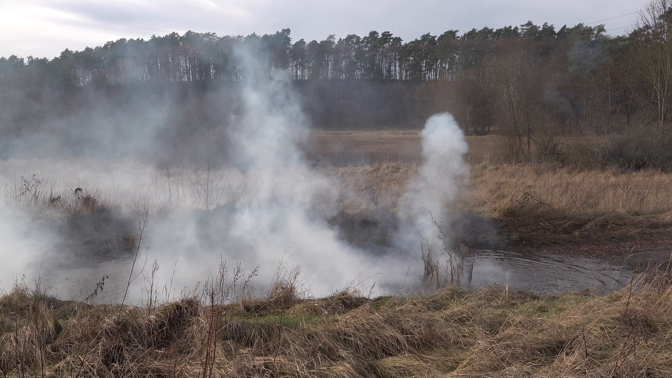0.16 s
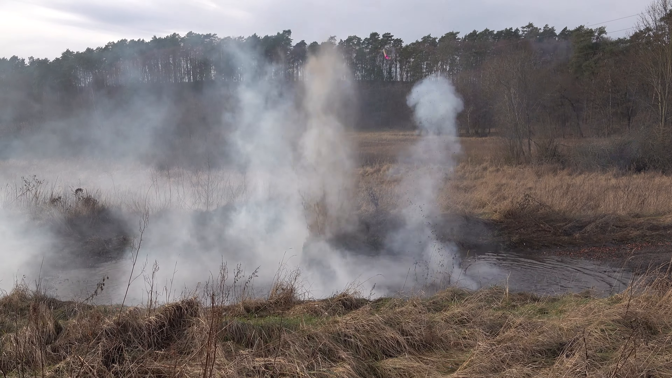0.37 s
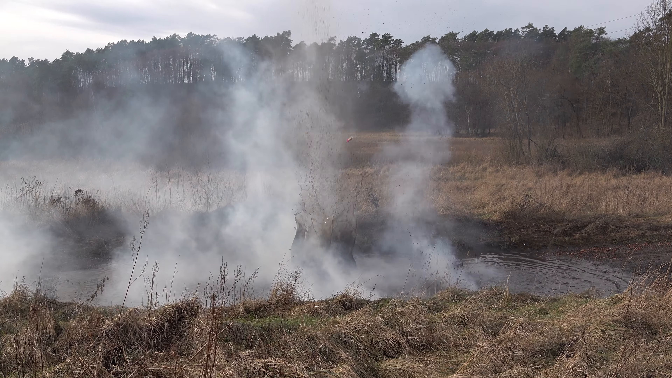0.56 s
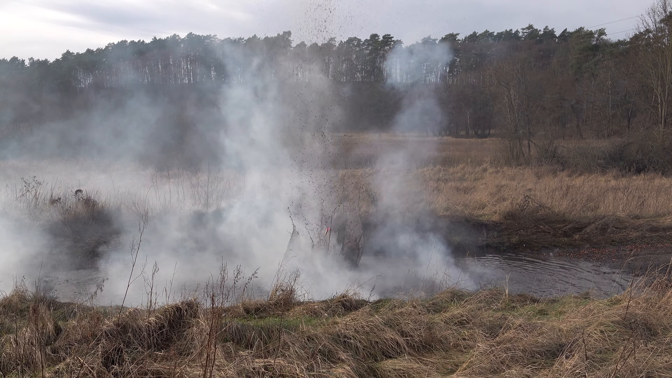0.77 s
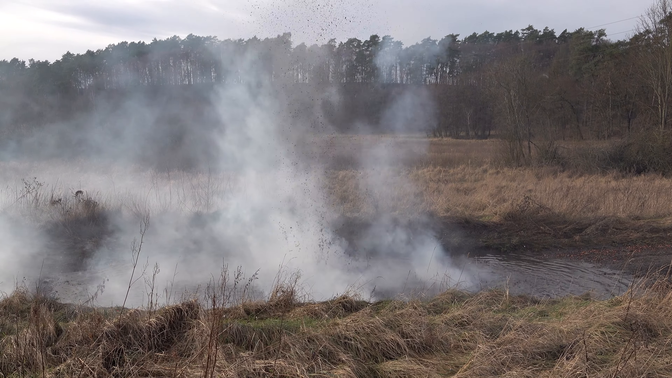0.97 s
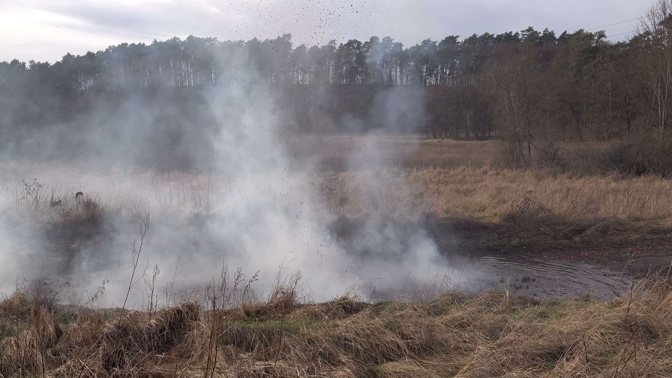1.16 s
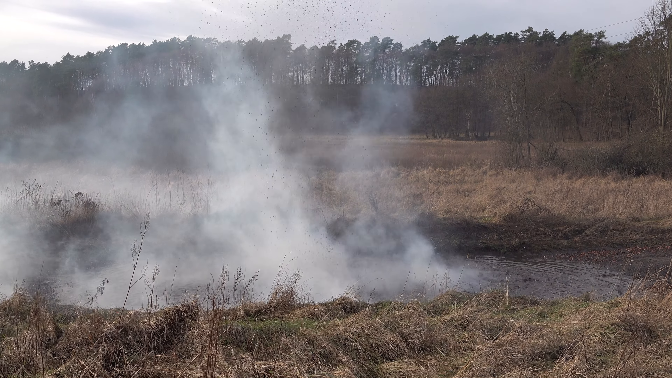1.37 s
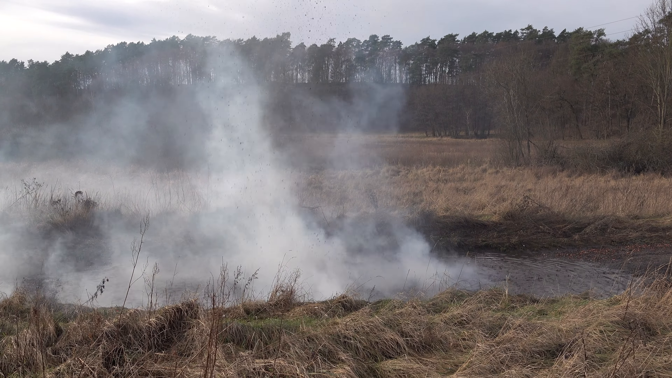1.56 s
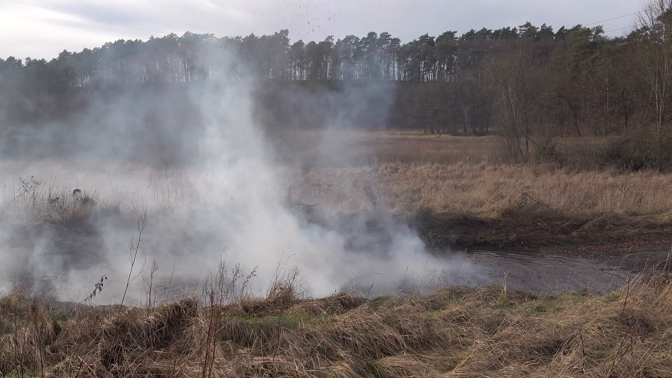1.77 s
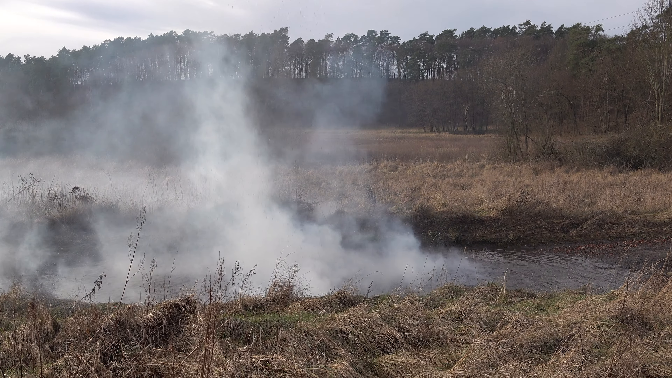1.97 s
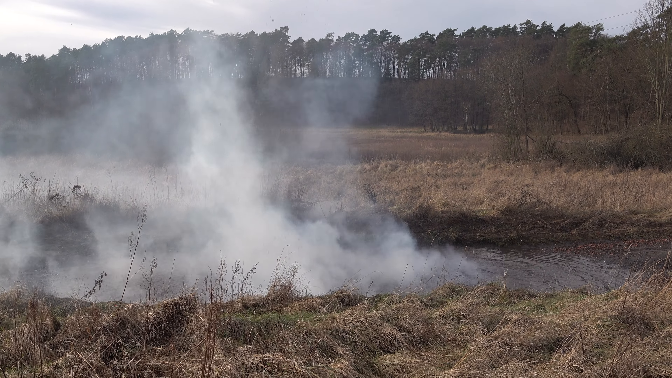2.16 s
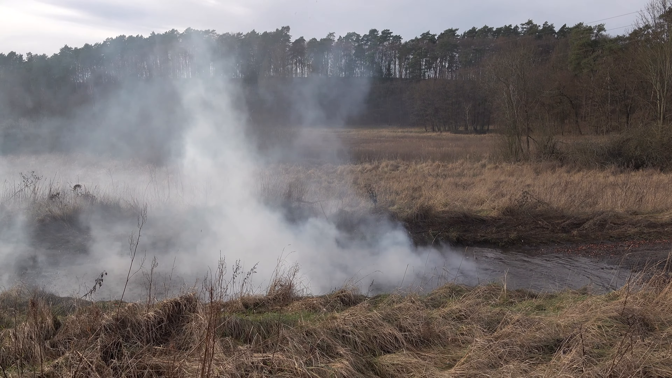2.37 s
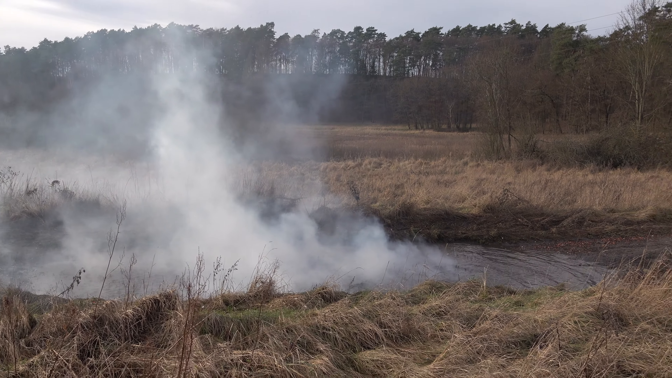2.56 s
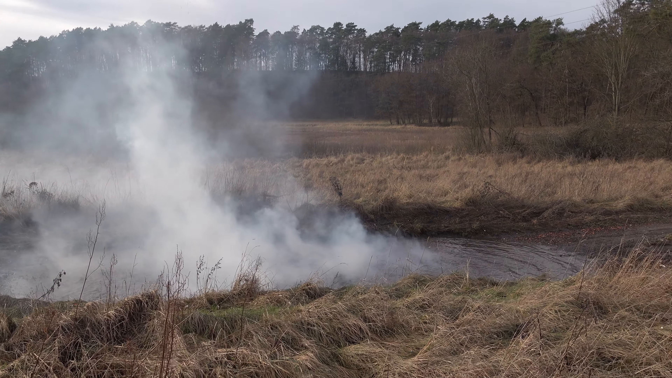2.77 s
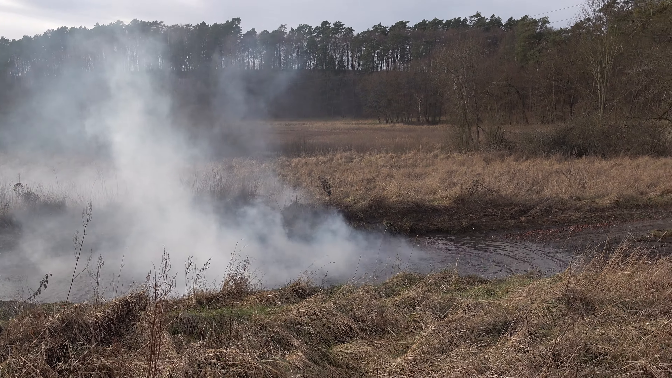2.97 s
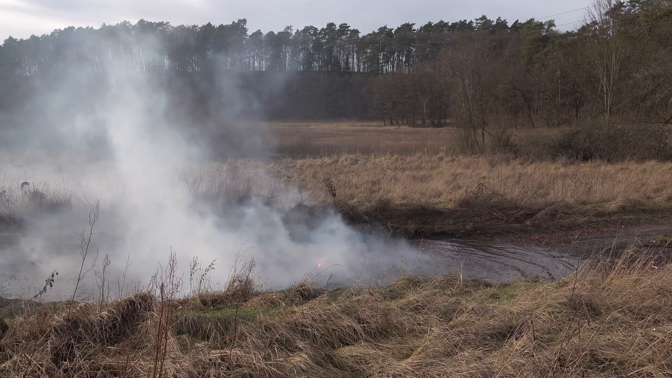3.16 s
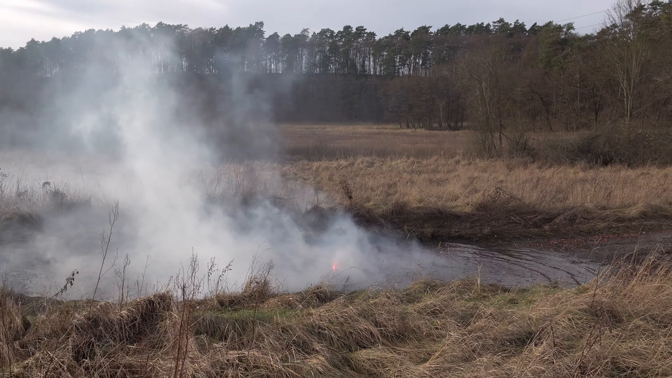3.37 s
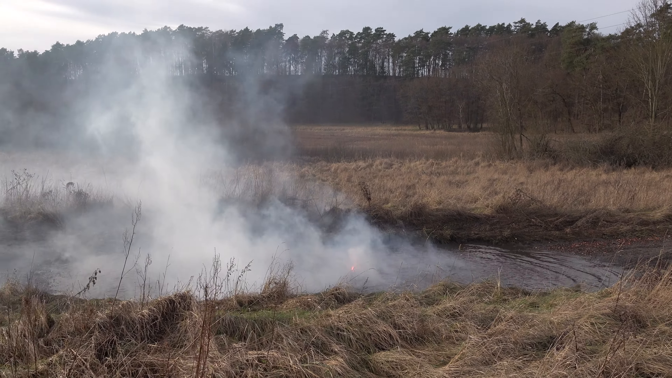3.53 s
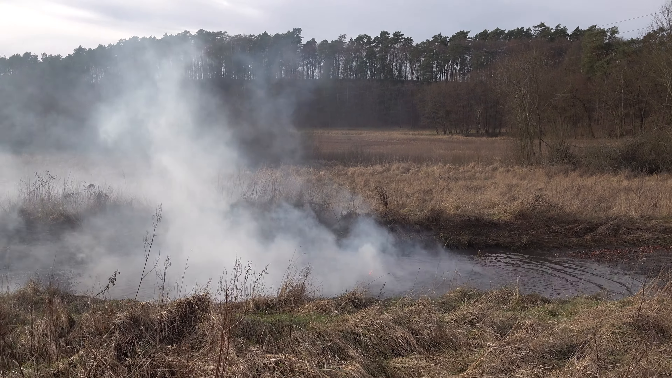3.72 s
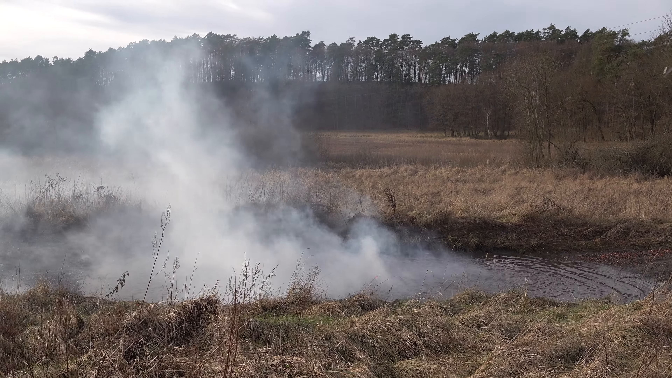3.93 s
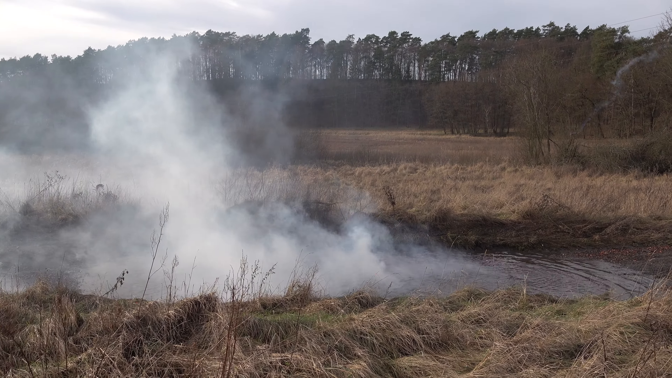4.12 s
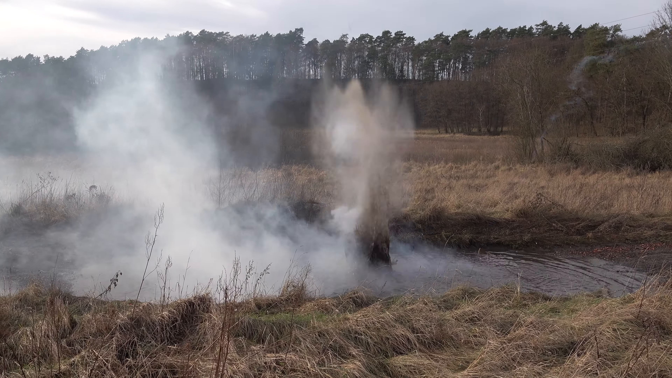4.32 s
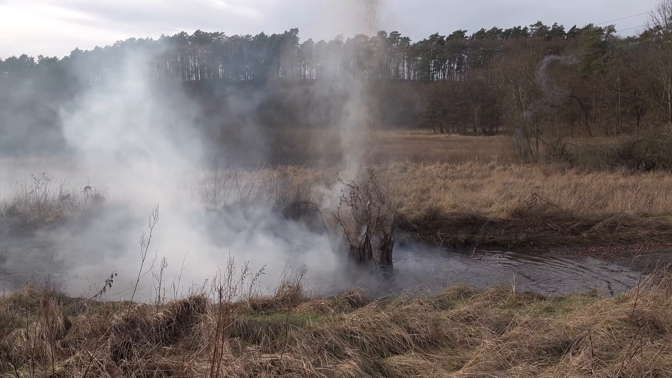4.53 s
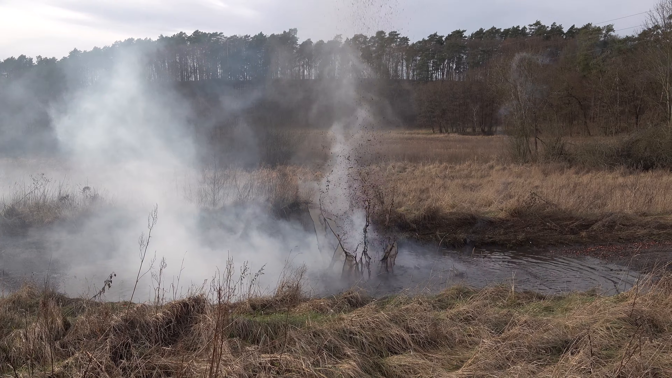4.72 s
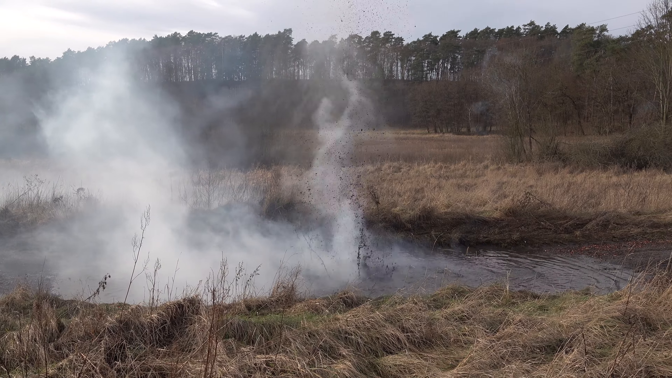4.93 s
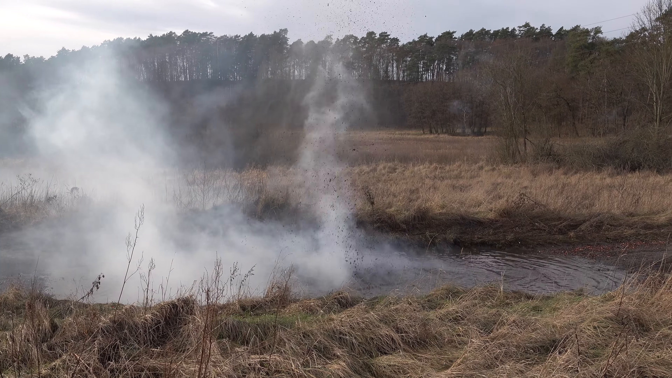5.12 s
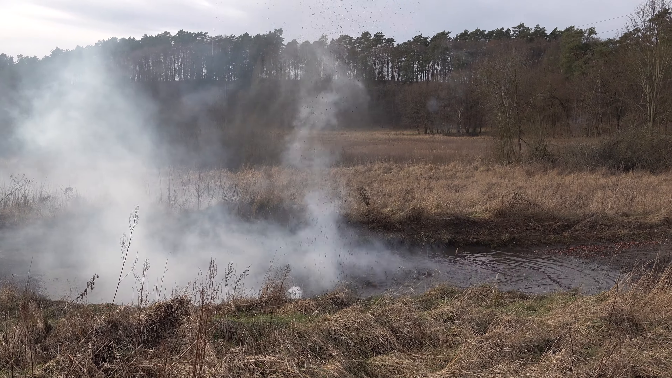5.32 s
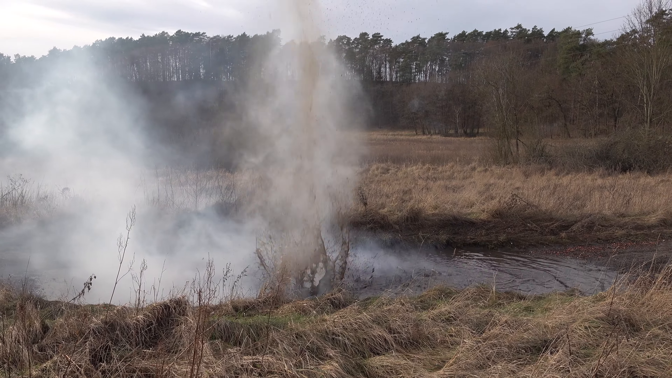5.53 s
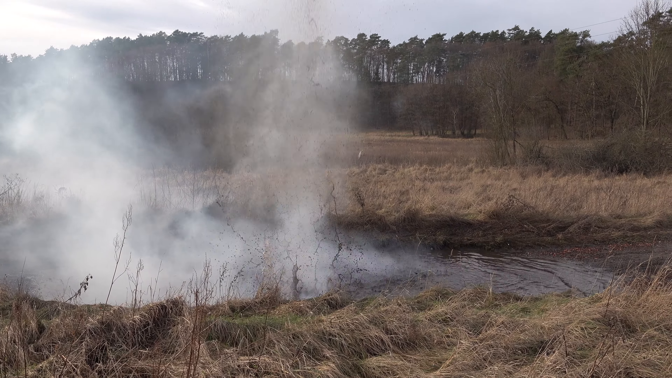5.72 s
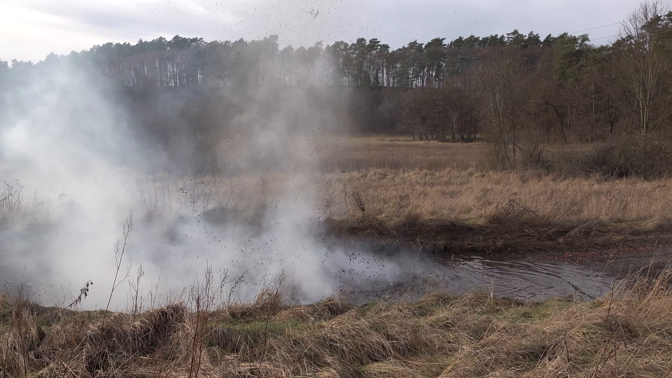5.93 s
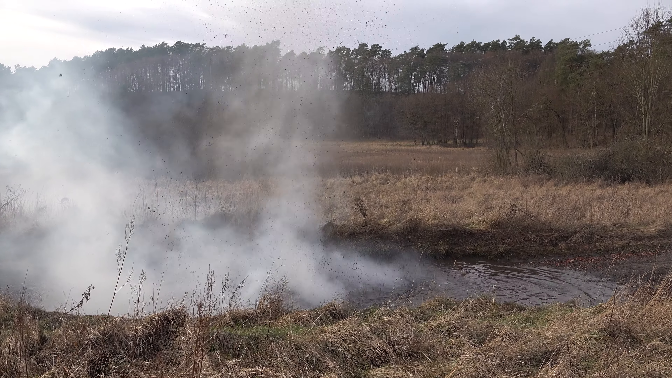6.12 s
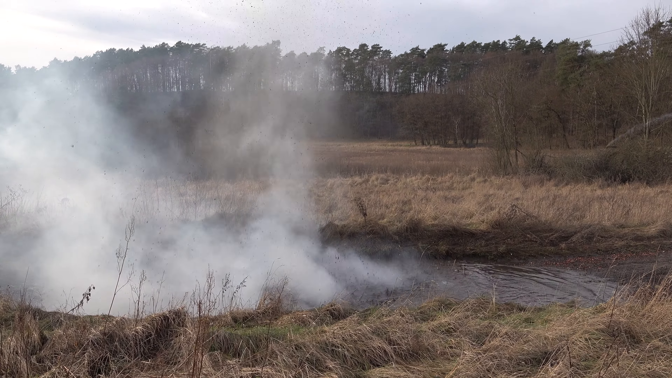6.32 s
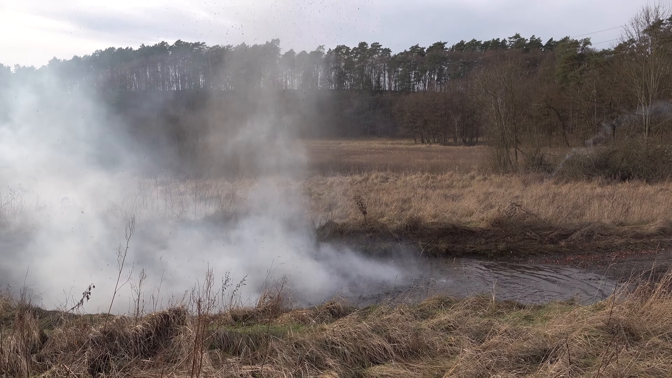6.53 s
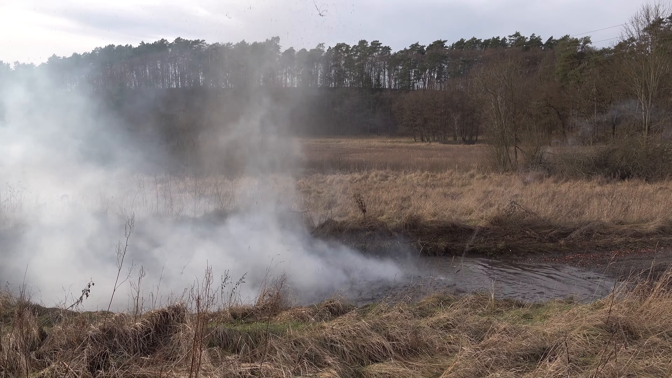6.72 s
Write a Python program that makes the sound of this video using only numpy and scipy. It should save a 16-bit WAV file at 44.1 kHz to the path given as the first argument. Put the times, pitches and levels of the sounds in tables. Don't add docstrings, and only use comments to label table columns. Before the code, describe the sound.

Four overloading firecracker explosions at a marshy pond, with hard bank slaps, rumbling forest echoes and showers of ticking, plinking droplets between them.

```python
import sys
import numpy as np
from scipy import signal
from scipy.io import wavfile

SR = 44100
rng = np.random.default_rng(int(sys.argv[2]) if len(sys.argv) > 2 else 0)


def boost_factor(decibels):
    exponent = np.asarray(decibels, float) / 20
    return 10 ** exponent


def bounce(signal):
    frames = np.transpose(np.atleast_2d(signal))
    limited = np.clip(frames, -1, 1)
    pcm = np.round(limited * 32767).astype(np.int16)
    wavfile.write(sys.argv[1], SR, pcm)


N = 299439

EDGES_HZ = 25 * 2 ** np.arange(0, 9.5, 1 / 3)


def at_hz(points, hz):
    points = np.array(points)
    return np.interp(np.log(hz), np.log(points[:, 0]), points[:, 1])


def drift(rate_hz, size):
    r = np.exp(-2 * np.pi * rate_hz / SR)
    slow = signal.lfilter([1], [1, -2 * r, r * r], rng.standard_normal(size + 4000))[4000:]
    return slow / slow.std()


def filtered(kind, order, hz, sound):
    return signal.sosfilt(signal.butter(order, hz, kind, fs=SR, output="sos"), sound)


def bands(white, edges_hz):
    pairs = zip(edges_hz, edges_hz[1:])
    cut = np.array([filtered("band", 2, pair, white[k % 2]) for k, pair in enumerate(pairs)])
    level = np.sqrt(np.diff(edges_hz))[:, None]
    return cut / cut.std(axis=1, keepdims=True) * level, np.sqrt(edges_hz[1:] * edges_hz[:-1])


def add(out, s, sound):
    at = round(s * SR)
    part = sound[max(-at, 0):N - at]
    out[max(at, 0):max(at, 0) + len(part)] += part


def knock(db, hz, t60, rise):
    t = np.arange(round(t60 * SR)) / SR
    shape = (1 - np.exp(-t / (rise * t60))) * boost_factor(-60 * t / t60)
    return -boost_factor(db) * shape / shape.max() * np.sin(2 * np.pi * hz * t)


def snap(db, hz, t60, grit):
    tone = knock(db, hz, t60, rise=.02)
    spread = signal.butter(2, [hz / 2, min(2.2 * hz, 13000)], "band", fs=SR)
    noise = signal.lfilter(*spread, rng.standard_normal(1500))
    noise = noise[200:200 + len(tone)] / noise.std()
    i = np.arange(len(noise))
    return tone + grit * boost_factor(db - 40 * i / len(noise)) * noise * np.clip(i / 6, 0, 1)


def breeze():
    gust_s, gust_length_s, gust_db = 2.93, .15, 11
    wind = filtered("band", 2, [10, 43], rng.standard_normal(N))
    murmur = filtered("band", 2, (90, 450), rng.standard_normal(N))
    gust = gust_db * np.exp(-((np.arange(N) / SR - gust_s) / gust_length_s) ** 2)
    wind *= boost_factor(-48 + gust + 1.66 * drift(15.0, N)) / wind.std()
    murmur *= boost_factor(-56.5) / murmur.std()
    return murmur + wind + boost_factor(-92) * rng.standard_normal(N)


def showers():
    # start t/s, patter level/dB
    falls = [(-2.4, -45), (0.85, -58), (0.02, -51), (4, -51), (4.5, -54.5)]
    stages_s = [0, .1, .5, 1.0, 2.05, 2.3, 2.95, 3.2]
    spray_db, thin_db, stragglers_db = -18.5, -5.5, -83
    stages_db = [-40, spray_db, spray_db, 0, 0, thin_db, thin_db, -40]
    t = np.arange(N) / SR
    powers = [boost_factor(db + np.interp(t - s, stages_s, stages_db)) ** 2 for s, db in falls]
    return np.sqrt(sum(powers) + boost_factor(stragglers_db) ** 2)


def patter():
    # f/Hz, level per Hz/dB
    colour = [(700, 6.5), (1500, -3.5), (3000, 1.5), (5500, -0.5), (9000, -9.5), (15000, -17.5)]
    ticks = rng.random((2, N)) < 2500 * boost_factor(3.0 * drift(14, N)) / SR
    sizes = boost_factor(7.68 * np.minimum(rng.exponential(1, (2, N)), 5)) * rng.choice([-1, 1], (2, N))
    wash = 3.0 * rng.standard_normal((2, N))
    grains, hz = bands(ticks * sizes + wash, EDGES_HZ[14:])
    rain = boost_factor(at_hz(colour, hz)) @ grains
    return rain / rain.std() * showers() * boost_factor(3.5)


def drops():
    # t/s, peak level/dB, f/Hz
    big = [(1.166, -30, 2770), (1.261, -28, 2950), (1.5605, -23, 1940), (1.629, -37, 2460),
           (1.7658, -28, 2900), (1.8, -24, 5660), (1.8958, -28, 1940), (1.912, -27.5, 1920),
           (2.105, -30, 1727), (2.155, -28.5, 3170), (2.2196, -22.5, 3020), (2.2391, -27, 2500),
           (2.2808, -28, 5330), (2.3211, -24, 4320), (2.3694, -26, 3600), (2.471, -27, 5660),
           (2.515, -38, 4550), (2.7838, -46, 2190), (2.831, -31, 3100), (2.8781, -31.5, 4030),
           (2.797, -37, 5600), (2.94, -35, 10800), (2.949, -27.5, 3170), (2.958, -35, 9540),
           (6.5042, -31, 3130), (6.604, -27.5, 2810), (6.6927, -20, 2980), (6.7522, -24, 4000),
           (6.7798, -29, 2275)]
    over_patter_db, spread_db, low_hz, high_hz = 12.5, 13.5, 1750, 9100
    out, rain, small = np.zeros(N), showers(), []
    for at, size, pitch in rng.random((330, 3)):
        db = 20 * np.log10(rain[int(at * N)]) + over_patter_db + spread_db * (size - .5)
        small.append((at * N / SR, db, low_hz * (high_hz / low_hz) ** pitch))
    for s, db, hz in [*big, *small]:
        add(out, s, snap(db - 4, hz, t60=18 / hz, grit=.6))
    return out


def column(db):
    t = np.arange(SR // 4) / SR
    hiss = filtered("high", 2, 5000, rng.standard_normal(len(t)))
    return hiss * boost_factor(db - 60 * t / .26) * np.clip(t / .008, 0, 1)


def scatter():
    size = round(2.9 * SR)
    lumps = boost_factor(2.24 * drift(108, size) + 1.13 * drift(38, size))
    return bands(rng.standard_normal((2, size)) * lumps, EDGES_HZ)


def belts(t, rows):
    s, db, swell, t60 = np.transpose(rows)[:4, :, None]
    decay_db = 60 * np.clip(t - s - swell, 0, None) / t60
    return (np.clip((t - s) / swell, 0, 1) * boost_factor(db - decay_db)) ** 2


def roll(land, hz, echo, boom, colour, late_s, air_db_per_s, boom_db=0):
    # f/Hz, level/dB
    boom_colour = [(35, -14), (70, -12), (110, -4.5), (160, 1.5), (230, -5), (320, -10), (600, -22.5),
                   (2000, -58)]
    echo_per_hz_db, boom_per_hz_db, tilt_hz, air_power = -32, -22, (440, 1500), 1.88
    t = np.arange(0, land.shape[1], 32) / SR
    delay = t - late_s * np.clip(t / .2, 0, 1)
    echoes, low, tilt = belts(delay, echo), belts(delay, boom).sum(axis=0), np.array(echo)[:, 4]
    since = np.arange(land.shape[1]) / SR
    out = np.zeros(land.shape[1])
    for band, f in zip(land, hz):
        octaves = np.log2(np.clip(f, *tilt_hz) / tilt_hz[1])
        dull = boost_factor(tilt * octaves + echo_per_hz_db + at_hz(colour, f))
        air = air_db_per_s * t * ((f / 4000) ** air_power - (min(f, 1500) / 4000) ** air_power)
        boom_gain = boost_factor(boom_per_hz_db + boom_db + at_hz(boom_colour, f))
        power = dull ** 2 @ echoes * boost_factor(-2 * air) + low * boom_gain ** 2
        out += band * np.interp(since, t, np.sqrt(power))
    return out * np.clip((since[-1] - since) / 0.27, 0, 1)


def reflectors(out, thuds, cracks, shift_s, gain_db):
    for s, db, hz, t60 in thuds:
        add(out, s + shift_s + .0005, knock(db + gain_db, hz, t60, rise=.015))
        if hz > 350:
            add(out, s + shift_s + .0008, snap(db + gain_db - 6, 1100, .004, grit=.4))
    for s, db, hz, t60 in cracks:
        add(out, s + shift_s, snap(db + gain_db, hz, t60, grit=.28))


def air_shock():
    rail, suction = 1.2, .6
    push_ms, bounce_ms, bounce_length_ms, release_ms, relax_ms = .53, .85, .4, 6.4, 2.5
    swing = np.clip(knock(9, 130, t60=.05, rise=.03), -suction, rail)
    ms = np.arange(len(swing)) * 1000 / SR
    swing = np.where(ms > release_ms, .75 * rail * np.exp((release_ms - ms) / relax_ms), swing)
    swing = np.where(ms < bounce_ms, -suction, swing)
    swing = np.where(ms < push_ms, .85 + .5 * ms, swing)
    after = ms - bounce_ms
    return swing + 1.4 * np.clip(after / .08, 0, 1) * np.clip(1.5 - 1.5 * after / bounce_length_ms, 0, 1)


def bank_blast(land, hz):
    # t after the blast/s, level/dB, swell/s, t60/s, tilt/(dB per octave)
    echo = [(.0015, -29, .001, 0.037, -3), (.006, -25.5, 0.024, 0.26, -6), (.03, -23.5, 0.036, 0.16, -6.5),
            (.08, -35.5, 0.013, 1.4, 14), (0.242, -20.5, 0.029, 0.53, -3), (.3, -28, .1, 1.5, -6),
            (.5, -36.5, 0.24, 4.7, -7), (.8, -41, 0.14, 1.3, -11)]
    # t after the blast/s, level/dB, swell/s, t60/s
    boom = [(.009, -8, .016, 0.32), (.035, -9, 0.023, 0.17), (.08, -25, .08, 3.2)]
    # f/Hz, level/dB
    colour = [(120, -20), (260, -9), (440, -6), (600, -4), (1000, -0.5), (3000, -5), (7000, -11.5),
              (15000, -20)]
    # t/s, peak level/dB, f/Hz, t60/s
    thuds = [(3.244, -9.5, 178, 0.047), (3.336, -13, 156, 0.031), (3.466, -16.5, 346, 0.025),
             (3.458, -14, 158, 0.054), (3.49, -19, 528, 0.013), (3.502, -17, 721, 0.019),
             (3.546, -12.5, 427, 0.015), (3.606, -14.5, 306, 0.022), (3.701, -21, 385, 0.052),
             (3.746, -26, 660, 0.024), (4.12, -23, 378, 0.017), (4.227, -29.5, 620, 0.023)]
    # t/s, peak level/dB, f/Hz, t60/s
    cracks = [(3.97, -27, 1318, 0.013), (4.12, -35, 1400, .008), (4.175, -23, 1100, .008),
              (3.212, -18, 1560, 0.0032), (3.2484, -17.5, 1510, 0.0049), (3.252, -12, 2260, 0.006),
              (3.292, -24, 2910, 0.0072), (3.3138, -25, 1850, 0.0038), (3.4905, -36, 1510, 0.0075),
              (3.551, -16, 1980, 0.004)]
    blast_s, out = 3.0495, np.zeros(N)
    size = land.shape[1]
    part = land[:, size // 3:5 * size // 6]
    add(out, blast_s, roll(part, hz, echo, boom, colour, late_s=0, air_db_per_s=12.5))
    add(out, blast_s, air_shock())
    add(out, 2.935, column(-50))
    reflectors(out, thuds, cracks, 0, 0)
    return out


def near_cracks():
    # t/s, peak level/dB, f/Hz, t60/s
    cracks = [(.3685, -8, 1250, .009), (.4128, -3, 2800, .0022), (3.0673, 1, 1500, .0024),
              (3.1226, -3, 2500, .004), (4.3528, -6, 1250, .010), (4.3943, -3, 3300, .0022),
              (5.4945, -8, 1500, .010), (5.5291, -4, 1500, .003), (5.5405, -9, 2200, .003)]
    out = np.zeros(N)
    reflectors(out, [], cracks, 0, 0)
    return out


def shock(swings):
    ms, swing = np.transpose(swings)
    return np.interp(np.arange(0, ms[-1], 1000 / SR), ms, swing)


def water_shock(dip_ms, push_ms, boom_db):
    end = dip_ms + push_ms
    dip = [(0, 0), (.4 * dip_ms, -.3), (.6 * dip_ms, -.95), (dip_ms - .03, -1.05)]
    push = [(dip_ms, .8), (dip_ms + .4, 1), (end, 1.2), (end + .05, .2), (end + .4, 0)]
    bubble = knock(boom_db / 2 - 7, 145, t60=.07, rise=.004)
    return np.concatenate([shock(dip + push), bubble])


def pond_blasts(land, hz):
    # t/s, extra delay of the far echoes/s, suction dip/ms, push/ms
    charges = [
        (-.0812, 0, .25, 1.8),
        (.3598, 0, .2, 1.75),
        (4.3423, 0, .35, 1.95),
        (5.4716, .0105, .4, 1.8),
    ]
    strengths = [1, -0.078, 0.54, -0.41]
    booms = [-2.5, 0, 0.5, -2.5]
    # t after the blast/s, level/dB, swell/s, t60/s, tilt/(dB per octave)
    echo = [(.003, -15.5, .005, 0.14, 0.5), (.014, -20, .014, 0.12, -6), (.033, -23, 0.035, 0.1, -6.5),
            (.15, -38, 0.055, .15, 2.5), (.06, -37.5, 0.0086, 0.6, -3), (.214, -24, 0.015, 0.27, -2),
            (0.238, -34, 0.0047, 0.037, 0), (.295, -30.5, 0.028, 0.92, -5), (.33, -36, 0.17, 1.1, -5),
            (0.498, -43, 0.5, 2.8, -6), (1.3, -50, 0.16, 2.65, -10.5)]
    # t after the blast/s, level/dB, swell/s, t60/s
    boom = [(.002, -10, .004, 0.29), (0.029, -23.5, 0.046, 0.47), (.05, -36, 0.082, 4)]
    # f/Hz, level/dB
    colour = [(120, -17), (260, -6), (440, 1.5), (680, -4), (1000, 0.5), (3600, -6.5), (7000, -14),
              (15000, -30)]
    # t/s, peak level/dB, f/Hz, t60/s
    thuds = [(.432, -21.5, 241, 0.099), (0.499, -25, 340, 0.025), (0.538, -30, 480, 0.022),
             (0.538, -24.5, 147, 0.12), (0.58, -24.5, 476, 0.034), (0.598, -27.5, 147, 0.12),
             (0.617, -17.5, 508, 0.02), (.71, -26, 149, 0.075), (0.749, -34.5, 410, 0.012),
             (0.772, -11.5, 422, 0.027), (.772, -34, 146, 0.081), (0.815, -18, 445, 0.015),
             (0.832, -26, 426, 0.0057), (0.873, -22.5, 435, 0.03), (.92, -23.5, 435, 0.028),
             (0.979, -21.5, 413, 0.02), (1.05, -28, 434, 0.017), (1.13, -35, 396, 0.032),
             (1.249, -32, 368, 0.02)]
    # t/s, peak level/dB, f/Hz, t60/s
    cracks = [(0.5804, -13, 2600, 0.0011), (0.7736, -31, 1800, 0.0048)]
    columns_db = [-33, -31, -34, -25]
    out, model_s, alike = np.zeros(N), charges[1][0], .4
    for k, (s, late_s, dip_ms, push_ms) in enumerate(charges):
        own = np.roll(land, 9001 * (k + 1), axis=1)
        common = np.roll(land, round(late_s * SR), axis=1)
        mixed = np.sqrt(alike) * common + np.sqrt(1 - alike) * own
        rolling = roll(mixed, hz, echo, boom, colour, late_s, air_db_per_s=9, boom_db=booms[k])
        add(out, s, boost_factor(strengths[k]) * rolling)
        add(out, s, water_shock(dip_ms, push_ms, booms[k]))
        add(out, s, column(columns_db[k]))
        reflectors(out, thuds, cracks, s - model_s + late_s, strengths[k])
    return out


def scene():
    land, hz = scatter()
    water = patter() + drops()
    bangs = bank_blast(land, hz) + near_cracks() + pond_blasts(land, hz)
    return (breeze() + water + bangs)[None]


def band_limit(x):
    return signal.sosfilt(signal.butter(12, 17090, fs=SR, output="sos"), x)


def record(dry):
    cut = filtered("high", 1, 95, dry)
    cut = filtered("high", 1, 60, cut)
    cut = signal.sosfilt(signal.cheby2(12, 50, 16400, fs=SR, output="sos"), cut)
    return band_limit(np.clip(cut, -.97, .97))


dry = scene()
out = record(dry)
bounce(out)
```